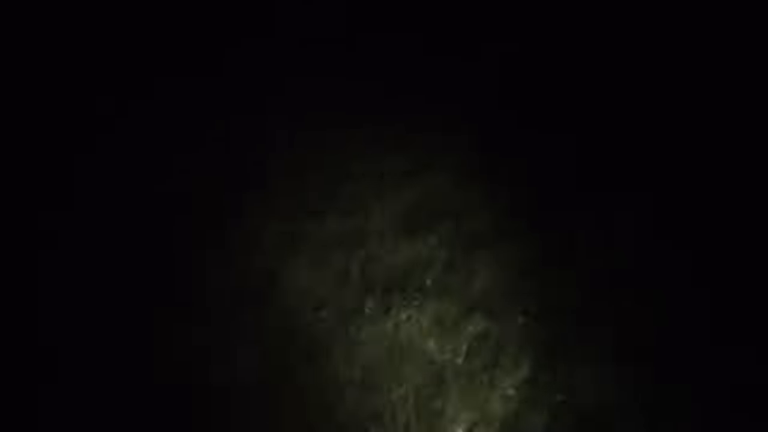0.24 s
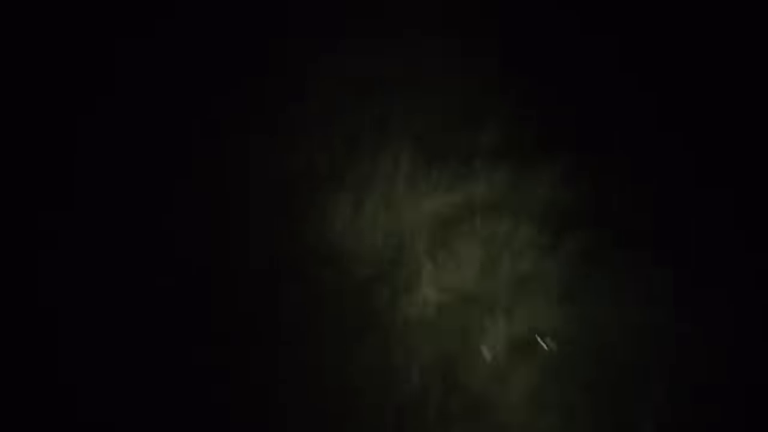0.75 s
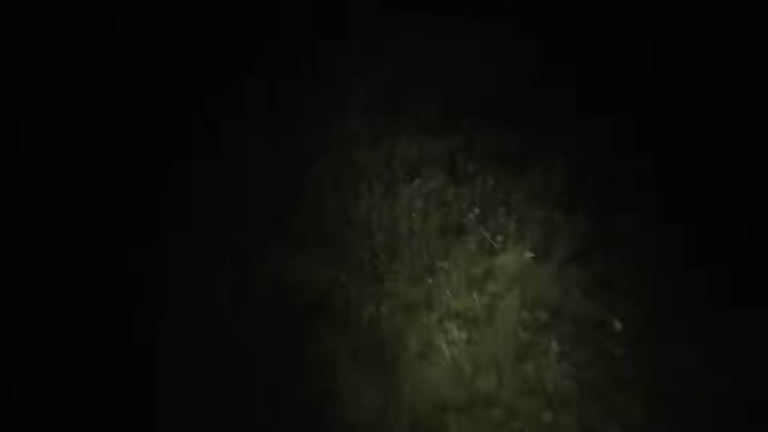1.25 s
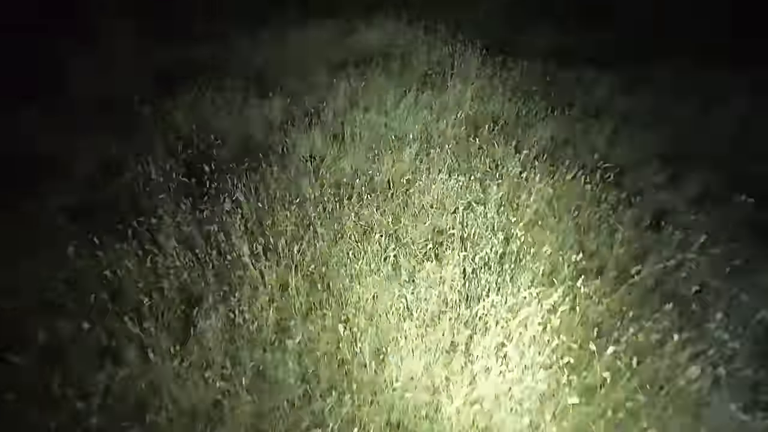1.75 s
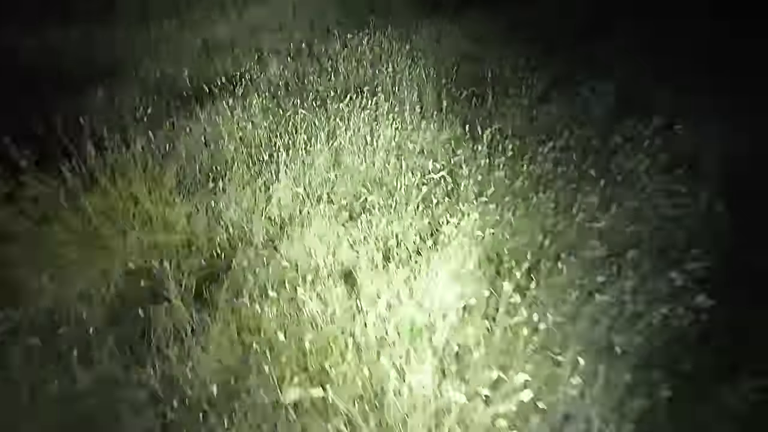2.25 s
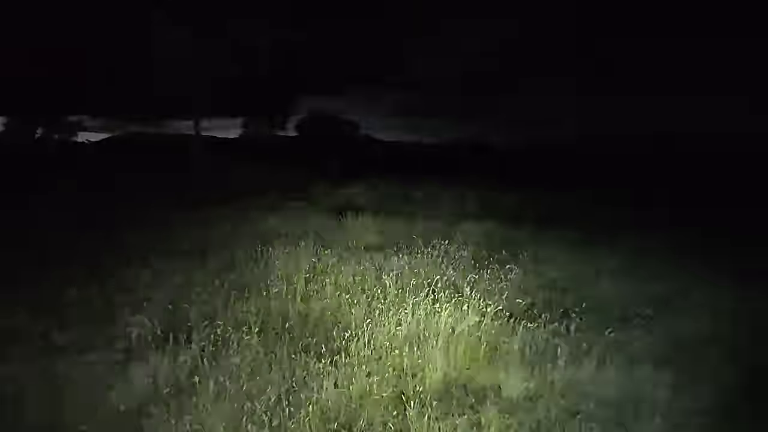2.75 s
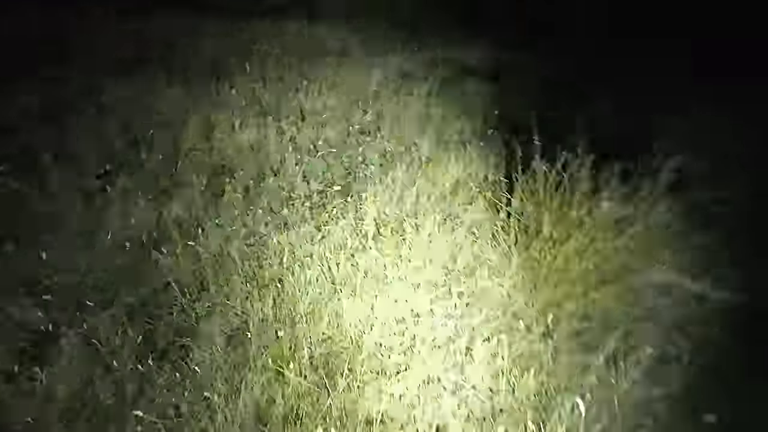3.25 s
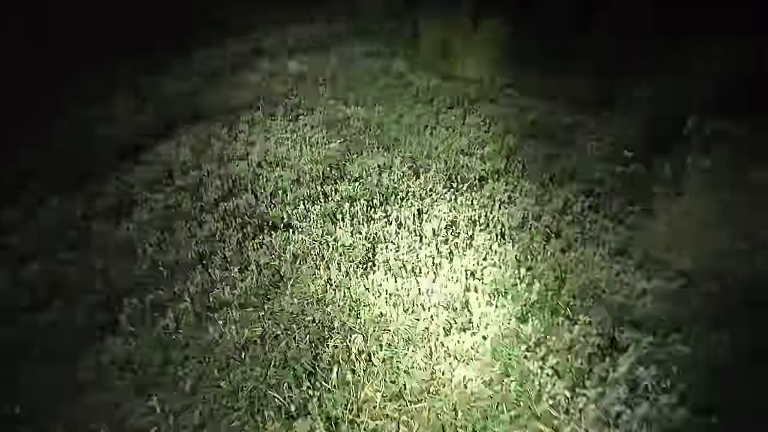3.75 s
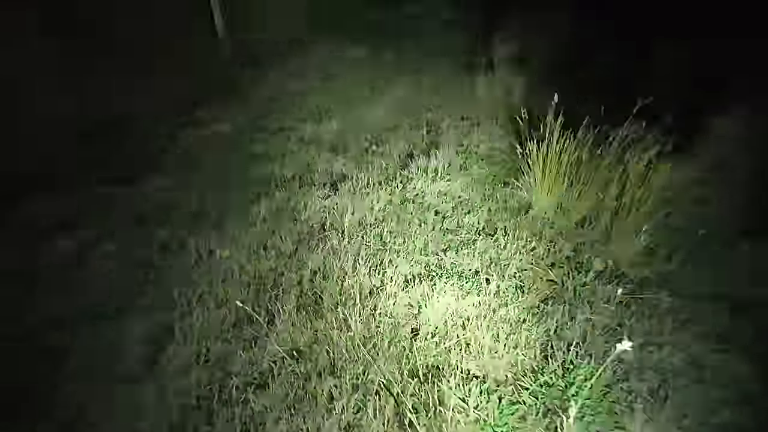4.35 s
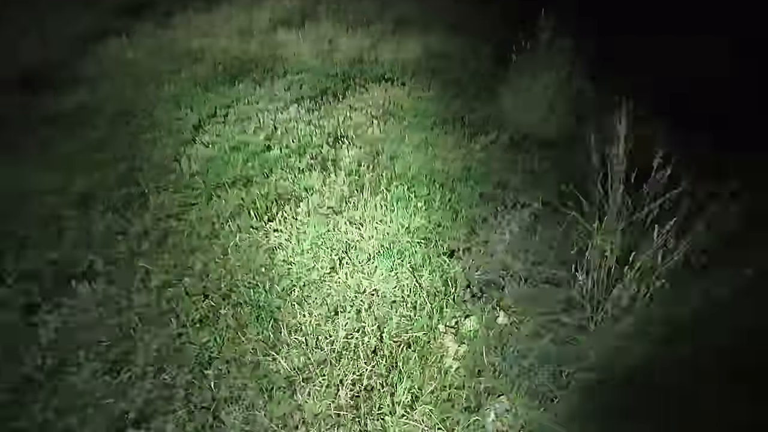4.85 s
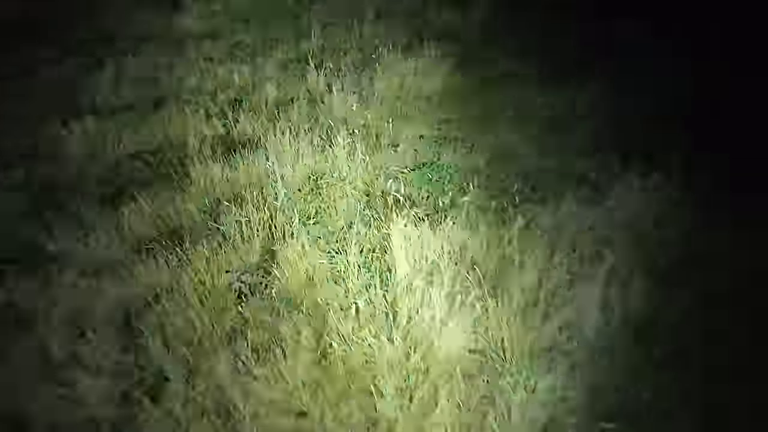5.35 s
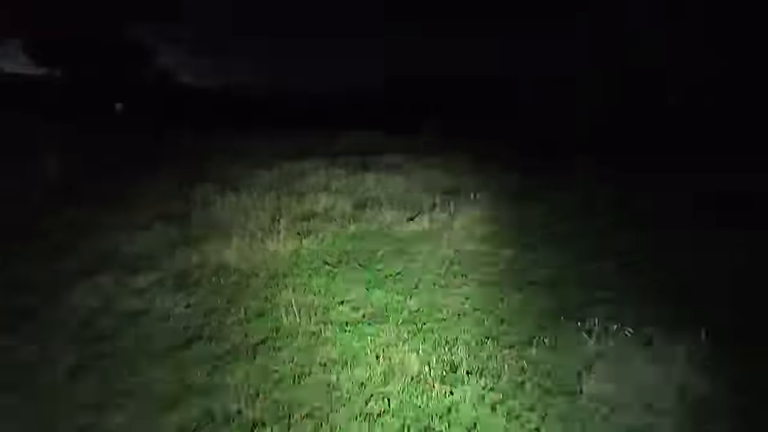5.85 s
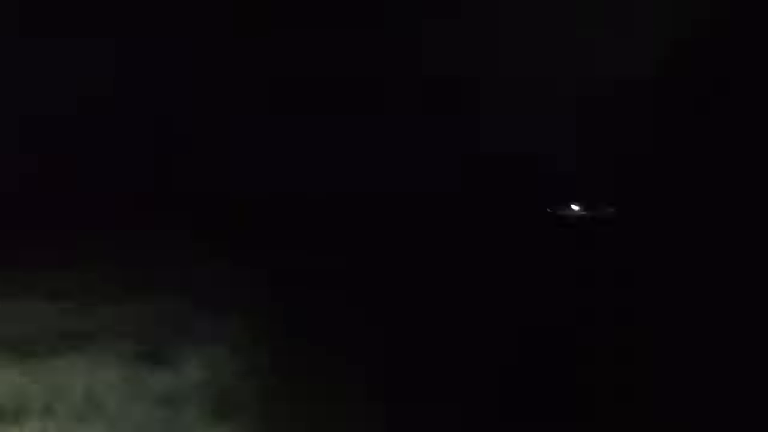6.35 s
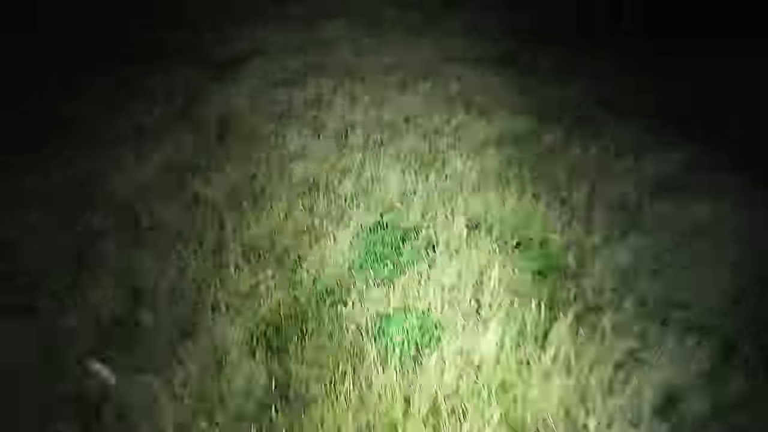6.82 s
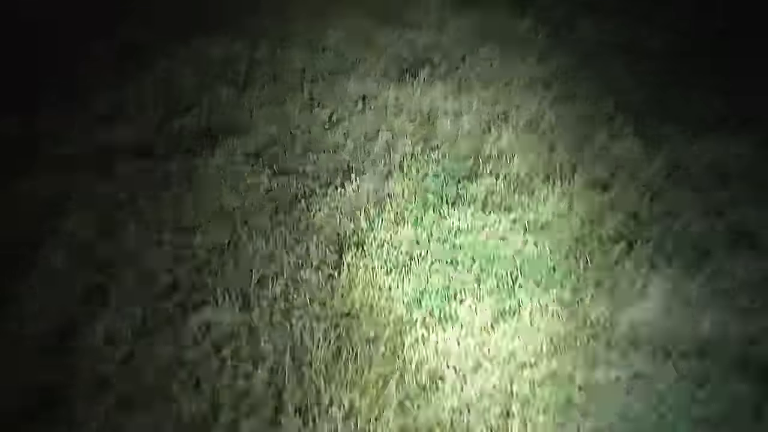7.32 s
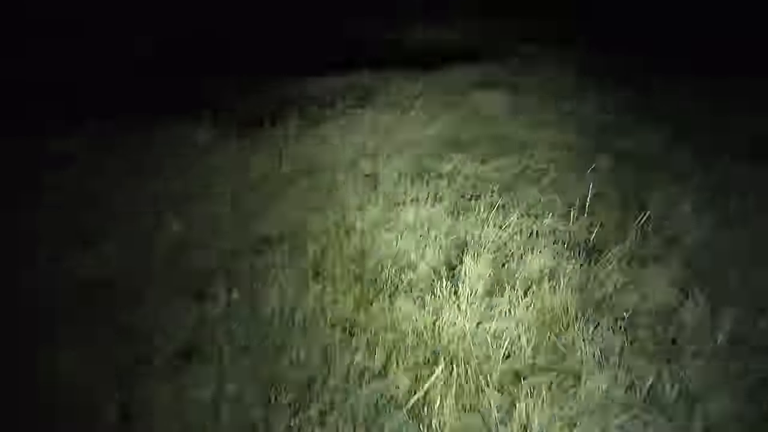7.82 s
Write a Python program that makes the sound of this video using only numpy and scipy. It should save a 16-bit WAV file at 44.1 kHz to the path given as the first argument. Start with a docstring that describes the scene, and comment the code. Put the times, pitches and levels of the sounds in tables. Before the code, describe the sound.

Close, restless wet-grass crackle in quick uneven swishes, with muffled fabric bumps, low fluttering thuds and a few tiny squeaks in an open field.

```python
"""Dull low thuds throb about seventeen times a second in a wet paddock at night, each sinking in pitch.
Legs sweep through the grass and snap wet stems at random into a crackle like heavy rain.
Close to the microphone, random slips make cloth rustle and rub, short ringing spikes make its folds knock,
and arching tones make a few tiny squeaks. Faint night air, made of coloured noise, lies behind.
Now and then the sound draws to the centre."""
import sys
import numpy as np
from scipy import signal
from scipy.io import wavfile
from scipy.ndimage import uniform_filter1d

SR = 44100
rng = np.random.default_rng(int(sys.argv[2]) if len(sys.argv) > 2 else 0)


def log_audio(samples):
    """Write samples as a 16-bit WAV file to the path given in sys.argv[1]."""
    # one column per channel
    frames = np.atleast_2d(samples).T
    # limit to full scale, then quantise
    limited = np.clip(frames, -1, 1)
    pcm = np.round(limited * 32767).astype(np.int16)
    wavfile.write(sys.argv[1], SR, pcm)


N = 356314

THUDS_PER_S = 17.2
# How far the thuds run behind an even beat. Each row: time in seconds, lag in seconds.
THUD_LAG = [(0, 0.057), (1.65, 0.023), (2.35, 0.037), (2.8, 0.017), (3.85, 0.015), (4.15, 0.0018),
            (5.85, 0.0014), (7.1, 0.0097), (8.08, 0.014)]


def from_db(db):
    """Decibels to gain."""
    return 10 ** (np.asarray(db) / 20)


def rms_one(x):
    """Scale to unit power."""
    return x / np.sqrt(np.mean(x ** 2) + 1e-20)


def along(curve, s):
    """Read a curve at these times in seconds."""
    return np.interp(s, *np.transpose(curve))


def at_hz(points, hz):
    """Read a table of (Hz, dB) on a log-frequency axis."""
    points_hz, points_db = np.transpose(points)
    return np.interp(np.log(hz), np.log(points_hz), points_db)


def panned(pan_db):
    """Left and right gains at constant power; positive leans left."""
    return rms_one(from_db(np.array([[pan_db], [-pan_db]]) / 2))


def stereo(pair, alike):
    """Mix two unrelated signals into left and right with this likeness (0-1)."""
    side = np.sqrt(1 - alike) * pair[1]
    return np.sqrt(1 + alike) * pair[0] + side * np.array([[1], [-1]])


def drift(rate_hz):
    """Slow chance with a spread of 1: smoothed noise, computed at every 20th sample."""
    step, settle = 20, 2000
    keep = np.exp(-2 * np.pi * rate_hz * step / SR)
    noise = rng.standard_normal(N // step + settle + 2)
    slow = signal.lfilter([1], [1, -2 * keep, keep ** 2], noise)[settle:]
    return np.interp(np.arange(N) / step, np.arange(len(slow)), rms_one(slow))


def grains(per_s, spread_db):
    """Two unrelated trains of tiny snaps: many weak, a few strong."""
    sizes = from_db(spread_db * np.minimum(rng.exponential(1, (2, N)), 4))
    signs = rng.choice([-1, 1], (2, N))
    struck = rng.random((2, N)) < per_s / SR
    return rms_one(sizes * signs * struck)


def snapping(per_s, spread_db, decay_s):
    """Envelope of random snaps, each starting at once and dying quickly; unit power."""
    keep = np.exp(-2 / (decay_s * SR))
    strikes = grains(per_s, spread_db)[0] ** 2
    return rms_one(np.sqrt(signal.lfilter([1], [1, -keep], strikes + 1e-18)))


def band(x, low_hz, high_hz):
    """Gentle band-pass."""
    sos = signal.butter(2, [low_hz, high_hz], "band", fs=SR, output="sos")
    return signal.sosfilt(sos, x + 1e-18)


def coloured(draws, colour, alike, patchy_db, flicker_hz, count=14):
    """Narrow bands, dealt in turn from two excitations, each with its own flicker."""
    out = 0
    edges = np.geomspace(colour[0][0], colour[-1][0], count + 1)
    for k, (low, high) in enumerate(zip(edges, edges[1:])):
        centre_db = at_hz(colour, np.sqrt(low * high))
        gain = from_db(centre_db + patchy_db * drift(flicker_hz))
        out = out + gain * band(draws[k % 2], low, high)
    return rms_one(stereo(out, alike))


def evened(x, span_s):
    """Hold the power near 1 over this span, leaving the finer grain alone."""
    size = int(span_s * SR)
    power = uniform_filter1d(uniform_filter1d(np.mean(x ** 2, axis=0), size), size)
    return x / np.sqrt(np.abs(power) + 1e-9)


def swell(s, half_s, skew=0):
    """Samples around one stroke and its bell-shaped force; skew shortens the rise and draws out the fall."""
    at = np.arange(max(int((s - 5 * half_s) * SR), 0), min(int((s + 5 * half_s) * SR), N))
    since = at / SR - s
    width_s = half_s * (1 + skew * np.sign(since))
    return at, np.exp(-.5 * (since / width_s) ** 2)


def strokes(rows, skew=0):
    """Joint envelope of overlapping strokes (s, dB, half length s); their powers sum."""
    power = np.zeros(N)
    for s, level_db, half_s in rows:
        at, force = swell(s, half_s, skew)
        power[at] += (from_db(level_db) * force) ** 2
    return np.sqrt(power)


def beats(per_s, lag):
    """Times of an even beat, each moved later by the lag curve."""
    even = np.arange(-2, per_s * N / SR + 1) / per_s
    return even + along(lag, even)


def thuds(thud_hz=104, spread_octaves=0.2015, half_s=0.0062, sink_per_s=31.86,
          octave_db=-8.5, level_db=-2.0, pan_db=11.0, uneven_db=2.1):
    """Dull low thuds: a brief tone and its octave on every beat, each sinking in pitch."""
    # Level of the thuds. Each row: time in seconds, level in dB before the shared trim and unevenness.
    thud_level = [(0, -45), (.25, -19), (.5, -33.5), (1.2, -31), (2.4, -30), (3.4, -28), (5.9, -27.5),
                  (7.1, -27.5), (8.08, -24.5)]
    # The heaviest thuds, added to the beat. Each row: time in seconds, level in dB before the same.
    heavy_thuds = [(0.289, -23), (0.746, -17.5), (1.029, -21.5), (2.353, -21), (2.755, -18), (2.806, -17.5),
                   (3.097, -19), (6.812, -15), (6.994, -18), (7.108, -17.5)]
    out = np.zeros((2, N))
    rows = [(s, along(thud_level, s)) for s in beats(THUDS_PER_S, THUD_LAG)] + heavy_thuds
    for s, db in rows:
        at, force = swell(s, half_s, skew=0.15)
        peak_hz = thud_hz * 2 ** (spread_octaves * rng.standard_normal())
        hz = peak_hz * np.exp(-sink_per_s * (at / SR - s))
        phase = 2 * np.pi * (np.cumsum(hz) / SR + rng.random((2, 1)))  # own phase left and right
        thud = np.sin(phase) + from_db(octave_db) * force * np.cos(2 * phase)
        gain = from_db(db + level_db + uneven_db * rng.standard_normal())
        out[:, at] += gain * force * np.sqrt(2) * thud
    return out * panned(pan_db)


def swishes(attack_s=0.0023, release_s=0.0022, sag_db=3, stir_db=-56.5):
    """Force of the legs on the grass: each sweep bites quickly, weakens a little, then the leg comes clear."""
    # The legs sweep in turn. Each row: start in seconds, length in seconds, starting level in dB
    # before the grass trim.
    sweeps = [(0.0, 0.12, -41.5), (0.137, 0.026, -36.5), (0.22, 0.025, -37), (0.27, 0.072, -44),
              (0.369, 0.029, -39.5), (0.441, 0.029, -41.5), (0.536, 0.055, -41), (0.616, 0.082, -46),
              (0.72, 0.082, -38.5), (0.814, 0.051, -40), (0.955, 0.073, -42.5), (1.059, 0.037, -36),
              (1.124, 0.11, -39.5), (1.25, 0.067, -42.5), (1.348, 0.037, -39.5), (1.416, 0.054, -42),
              (1.484, 0.12, -37.5), (1.614, 0.068, -42), (1.688, 0.097, -43), (1.872, 0.079, -36.5),
              (1.995, 0.05, -43.5), (2.048, 0.091, -39), (2.162, 0.056, -39.5), (2.23, 0.067, -35.5),
              (2.31, 0.053, -38.5), (2.381, 0.052, -38), (2.456, 0.077, -41.5), (2.551, 0.06, -37),
              (2.624, 0.12, -40.5), (2.747, 0.041, -33.5), (2.797, 0.069, -42.5), (2.898, 0.056, -39),
              (2.972, 0.14, -41), (3.148, 0.037, -38), (3.192, 0.087, -37.5), (3.319, 0.041, -38.5),
              (3.374, 0.075, -40), (3.456, 0.054, -41.5), (3.524, 0.058, -38.5), (3.594, 0.089, -40.5),
              (3.709, 0.042, -37.5), (3.782, 0.07, -41.5), (3.868, 0.043, -37.5), (3.951, 0.15, -42),
              (4.12, 0.14, -41.5), (4.266, 0.054, -43), (4.345, 0.044, -37.5), (4.405, 0.09, -42),
              (4.498, 0.052, -37.5), (4.572, 0.045, -42.5), (4.637, 0.087, -41), (4.734, 0.045, -38.5),
              (4.792, 0.075, -43.5), (4.87, 0.07, -40), (4.951, 0.052, -38), (5.038, 0.041, -40),
              (5.099, 0.086, -38.5), (5.2, 0.044, -39.5), (5.264, 0.056, -35), (5.34, 0.075, -42),
              (5.442, 0.073, -35.5), (5.543, 0.047, -43), (5.625, 0.038, -39), (5.682, 0.084, -42.5),
              (5.79, 0.043, -35.5), (5.852, 0.095, -45), (5.958, 0.049, -40.5), (6.042, 0.14, -41),
              (6.208, 0.056, -42.5), (6.291, 0.093, -39), (6.393, 0.064, -42.5), (6.477, 0.05, -36.5),
              (6.561, 0.043, -44), (6.621, 0.041, -35.5), (6.675, 0.094, -41.5), (6.79, 0.088, -36.5),
              (6.905, 0.044, -40.5), (6.974, 0.079, -41), (7.068, 0.1, -38), (7.178, 0.11, -41.5),
              (7.308, 0.047, -35), (7.365, 0.073, -40.1), (7.446, 0.07, -33.5), (7.539, 0.087, -42),
              (7.623, 0.067, -38), (7.71, 0.071, -42), (7.783, 0.076, -36), (7.902, 0.036, -39),
              (7.953, 0.037, -39.5), (8.028, 0.051, -40)]
    power = np.full(N, from_db(stir_db) ** 2)  # stems still stirring between sweeps
    for start, length_s, level_db in sweeps:
        first = max(int((start - length_s / 2) * SR), 0)
        at = np.arange(first, min(int((start + 2 * length_s) * SR), N))
        since = at / SR - start
        bite = (1 + np.tanh(since / attack_s / 2)) / 2
        clear = (1 + np.tanh((length_s - since) / release_s / 2)) / 2
        sagging = from_db(level_db - sag_db * since / length_s)
        power[at] += (bite * clear * sagging) ** 2
    return np.sqrt(power)


def stem_ticks(per_s=11, spread_db=3.0, decay_s=0.0014, width_ratio=1.324, count=12):
    """Single stems crack and flick off water: ticks of about a millisecond, in twelve treble bands."""
    out = 0
    for hz in np.geomspace(1500, 11500, count):
        hiss = band(rng.standard_normal(N), hz, hz * width_ratio)
        out = out + snapping(per_s, spread_db, decay_s) * hiss  # the rate holds in each band
    return rms_one(out)


def grass(level_db=1.0, clump_db=2.0, snap_share=0.48, tick_db=-5.0, whip_db=-27.5):
    """Wet stems snap past the legs in sharp little clumps; hard strokes whip the tips into a high sizzle."""
    # Tone of the stems. Each row: frequency in Hz, level in dB.
    stem_colour = [(300, 3), (1200, -3.5), (2000, -1), (2900, 4.5), (4800, 4), (6800, -0.5), (8700, 1.5),
                   (11500, 0), (13500, 4), (16000, -9.5)]
    # Tall tufts whipping the legs. Each row: peak time in seconds, level in dB before the clumps,
    # half length in seconds before the skew.
    whips = [(0.39, -33, 0.004), (1.707, -32.5, 0.0036), (1.905, -24.5, 0.0052), (2.098, -26, 0.0066),
             (3.046, -25, 0.014), (3.0615, -26, 0.00072), (4.2965, -24.5, 0.0022), (4.648, -31, 0.004),
             (4.918, -25.5, 0.0077), (6.317, -17, 0.011), (6.708, -31, 0.0035), (6.8, -22, 0.0096),
             (6.973, -26.5, 0.0041), (7.324, -25, 0.0031)]
    noise = rng.standard_normal((2, 2, N))
    crackle = coloured(noise, stem_colour, alike=0.96, patchy_db=3.0, flicker_hz=55, count=24)
    crackle = crackle + from_db(tick_db) * stem_ticks()
    sizzle = rms_one(band(rng.standard_normal(N), low_hz=9900, high_hz=13500))
    force = np.hypot(from_db(level_db) * swishes(), strokes(whips, skew=0.47))
    # the sizzle's share of the power grows with force, up to 0.8
    whipped = .8 * force ** 2 / (force ** 2 + from_db(whip_db) ** 2)
    sound = np.sqrt(1 - whipped) * crackle + np.sqrt(whipped) * sizzle
    snaps = snapping(per_s=570, spread_db=3.5, decay_s=0.002)
    clumps = np.sqrt(1 - snap_share + snap_share * snaps ** 2)
    return force * sound * clumps * from_db(clump_db * drift(64))


def clothing(level_db=2.5, catch_db=4.5, jolt_db=6.0, jolt_half_s=0.013):
    """Fabric slips in short dull bursts, most around each thud, differently at each microphone port."""
    # Tone of the cloth. Each row: frequency in Hz, level in dB.
    cloth_colour = [(40, -41), (120, -1), (250, 1), (500, -2.5), (850, -8.5), (1400, -16.5), (2500, -26),
                    (5000, -32.5), (15000, -35.5)]
    # Running rustle. Each row: time in seconds, level in dB before the jolts and the trim.
    effort = [(0, -34), (.2, -29.5), (.43, -41), (.58, -32.5), (1.15, -34.5), (1.45, -42), (1.65, -36.5),
              (2.36, -39), (2.7, -58), (2.98, -38), (3.74, -48.5), (4.03, -34.5), (5.15, -45),
              (5.52, -40.5), (6.4, -45), (6.65, -50), (7.1, -44), (7.5, -56.5), (7.87, -54), (8.03, -38)]
    slips = [grains(per_s=750, spread_db=4.5) for _ in range(2)]
    rustle = coloured(slips, cloth_colour, alike=0.34, patchy_db=4.5, flicker_hz=17.7)
    rustle = rustle * from_db(catch_db * drift(46))
    jolts = strokes([(s, 0, jolt_half_s) for s in beats(THUDS_PER_S, THUD_LAG)])
    effort_db = along(effort, np.arange(N) / SR) + jolt_db * jolts
    return from_db(effort_db + level_db) * evened(rustle, span_s=0.11)


def rubs(edge_ratio=9.9, muffle_ratio=2.4):
    """A fold drags past the microphone: a quick run of muffled slips, each drag with its own brightness."""
    # Cloth close to the microphone. Each row: peak time in seconds, level in dB, half length in seconds
    # before the skew, upper band edge in Hz, left over right in dB.
    drags = [(0.032, -22.5, 0.004, 905, 5), (0.136, -20, 0.007, 710, 0), (0.155, -20, 0.0053, 1090, 0),
             (0.215, -28, 0.015, 740, -6), (0.283, -20.5, 0.0045, 960, -2), (0.509, -21, 0.0088, 1340, -12),
             (0.541, -21.5, 0.004, 1550, 0), (0.577, -27.5, 0.017, 1480, 20),
             (0.874, -24.5, 0.0056, 1110, 21), (1.113, -16.5, 0.0043, 1890, 19),
             (1.13, -27.5, 0.014, 1390, 2), (1.182, -27.5, 0.017, 2000, -8), (1.314, -23, 0.0044, 755, -15),
             (1.609, -23, 0.0081, 650, 1), (1.671, -23, 0.006, 1200, 9), (1.827, -22.5, 0.0083, 910, -3),
             (1.872, -16, 0.0086, 1400, 0), (2.635, -23.5, 0.0083, 1800, -19),
             (2.913, -26, 0.0077, 1340, -8), (3.042, -24, 0.0045, 1710, 3), (3.065, -20.5, 0.0032, 1720, 0),
             (3.599, -25, 0.0024, 2210, -1), (4.024, -20.5, 0.0054, 530, 14),
             (4.368, -28.5, 0.0052, 1310, -5), (4.405, -23, 0.0093, 705, 14),
             (4.552, -19, 0.0043, 990, -10), (4.648, -23.5, 0.0061, 1320, 7), (4.758, -24, 0.0043, 830, 7),
             (4.881, -29.5, 0.008, 910, 0), (4.917, -22.5, 0.005, 1690, 8), (5.292, -25.5, 0.0046, 855, -3),
             (5.36, -24, 0.0034, 1460, -11), (5.412, -23, 0.0081, 1320, -30),
             (5.829, -31.5, 0.0051, 1590, -22), (6.033, -27, 0.0059, 775, 0),
             (6.118, -27, 0.0064, 1160, -7), (6.322, -18, 0.0051, 1050, 1), (6.359, -19.5, 0.013, 633, 4),
             (6.473, -17.5, 0.0075, 2600, -32), (6.803, -25.5, 0.0069, 736, 0),
             (6.984, -26.5, 0.0039, 860, 1), (7.086, -27, 0.0034, 685, -4),
             (7.755, -29.5, 0.0094, 830, -13), (7.964, -16.5, 0.01, 2350, -21),
             (8.033, -27, 0.023, 1500, -34)]
    out = np.zeros((2, N))
    slips = stereo(grains(per_s=2600, spread_db=4.0), alike=0.73)
    for s, peak_db, half_s, top_hz, pan_db in drags:
        at, force = swell(s, half_s, skew=0.17)
        muffle = signal.butter(2, top_hz * muffle_ratio, fs=SR)
        dull = signal.lfilter(*muffle, band(slips[:, at], top_hz / edge_ratio, top_hz))
        burst = force * dull
        # give each channel the energy of the force curve
        energy = np.sum(burst ** 2, axis=1, keepdims=True) + 1e-12
        burst = burst * np.sqrt(np.sum(force ** 2) / energy)
        out[:, at] += from_db(peak_db) * burst * panned(pan_db)
    return out


def knocks(level_db=-5.5, waver=0.42, rise_cycles=0.4, ring_cycles=0.65):
    """A fold snaps on the housing: a rounded spike of pressure, then an unsteady ring that soon dies."""
    # Taut folds on the microphone housing. Each row: time in seconds, peak in dB before the shared trim,
    # pitch in Hz before the waver, left over right in dB.
    fold_snaps = [(0.0746, -5, 1520, 0), (0.1531, 0, 557, 0), (0.2143, -9, 560, 0), (0.3583, -9, 1160, -27),
                  (0.5014, -7, 1350, -16), (0.5183, -6, 860, 15), (0.584, -14, 1050, -2),
                  (0.6701, -12, 594, 16), (0.6983, -8, 890, 0), (1.0464, -3, 1070, 14),
                  (1.109, -8, 1310, 15), (1.1133, -5, 1000, 12), (1.566, -12, 674, 0),
                  (1.6618, 1, 1020, 15), (1.8118, -5.5, 620, -13), (1.871, -21, 1190, 0),
                  (2.9971, -5.5, 810, -26), (3.135, -13.5, 760, 10), (4.0847, -2, 1210, 23),
                  (5.2835, -4.5, 730, -11), (5.5863, -0.5, 1490, -26), (5.6427, -7.5, 1440, -16),
                  (6.4749, -20, 1870, -25), (7.965, -7, 1690, -22), (8.0478, -1.5, 1040, -27)]
    out = np.zeros((2, N))
    unsteady = 1 + waver * drift(460)
    for s, peak_db, hz, pan_db in fold_snaps:
        at, _ = swell(s, 1 / hz)
        cycles = (at / SR - s) * hz
        fade = np.where(cycles < 0, (cycles / rise_cycles) ** 2, cycles / ring_cycles)
        ring = np.exp(-fade) * np.cos(2 * np.pi * cycles * unsteady[at])
        out[:, at] += from_db(peak_db + level_db) * ring * panned(pan_db)
    return out


def squeaks(bend=0.34, rough=0.34, grip=0.6, sag_per_s=15.2, waver=0.087, overtone_db=-24.0):
    """A wet surface grips and squeals while the force is high enough: the pitch arches, sags and wavers."""
    # Each row: peak time in seconds, level in dB, half length of the force in seconds,
    # pitch at the peak in Hz before the waver, octave against the fundamental in dB.
    squeals = [(2.103, -21.5, 0.0064, 1297, -13), (2.122, -32, 0.0032, 1430, 5),
               (2.753, -28, 0.0037, 1280, -6), (2.772, -24, 0.0055, 1385, 0.5),
               (7.184, -27, 0.0032, 1770, -13), (7.205, -28, 0.0061, 1515, -2.5),
               (7.79, -35, 0.005, 1456, -17)]
    out = np.zeros(N)
    grit = 1 + rough * drift(170)
    unsteady = 1 + waver * drift(1000)
    for s, level_db, half_s, top_hz, octave_db in squeals:
        at, force = swell(s, half_s)
        sag = np.exp(-sag_per_s * (at / SR - s))
        hz = top_hz * force ** bend * sag * unsteady[at]
        phase = 2 * np.pi * np.cumsum(hz) / SR
        upper = from_db(overtone_db) * (np.sin(3 * phase) + np.sin(4 * phase))
        tone = np.sin(phase) + from_db(octave_db) * (np.sin(2 * phase) + upper)
        gripping = force ** 6 / (force ** 6 + grip ** 6)
        out[at] += from_db(level_db) * gripping * grit[at] * np.sqrt(2) * tone
    return out


def night_air(level_db=-43.5):
    """A faint rumble and hiss over the open field: noise weighted to the low end."""
    # Tone of the air. Each row: frequency in Hz, level in dB.
    air_colour = [(25, 7), (100, 24), (1000, -11), (16000, -33)]
    noise = rng.standard_normal((2, 2, N))
    air = coloured(noise, air_colour, alike=0.044, patchy_db=3.0, flicker_hz=6.8)
    return from_db(level_db) * air


def narrowed(x, centre_db=-1.0):
    """For brief moments the width closes and the sound gathers in the centre."""
    # Each row: middle of the moment in seconds, half length of its bell curve in seconds.
    moments = [(0.123, 0.083), (0.774, 0.029), (1.185, 0.04), (1.91, 0.036), (2.119, 0.024), (2.791, 0.034),
               (3.075, 0.032), (4.937, 0.024), (6.348, 0.03), (6.818, 0.017), (7.223, 0.019),
               (7.825, 0.022)]
    bells = strokes([(s, 0, half_s) for s, half_s in moments])
    closed = np.clip(2 * bells ** 2, 0, 1)
    mid = np.mean(x, axis=0)
    return mid * from_db(centre_db * closed) + (x - mid) * (1 - closed)


def scene():
    """Thuds, grass and cloth are all close by; the open field gives no echo."""
    close_by = thuds() + grass() + clothing() + rubs() + knocks() + squeaks()
    return narrowed(close_by + night_air())


def record(dry, cutoff_hz=15950):
    """The tallest peaks are rounded and the top is cut steeply."""
    low_pass = signal.ellip(12, .2, 80, cutoff_hz, fs=SR, output="sos")
    return signal.sosfilt(low_pass, np.tanh(dry))


dry = scene()
out = record(dry)
log_audio(out)
```